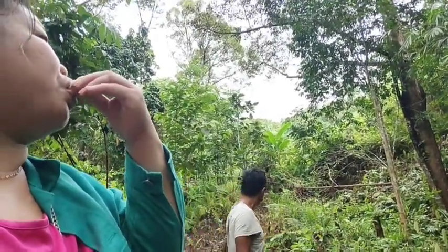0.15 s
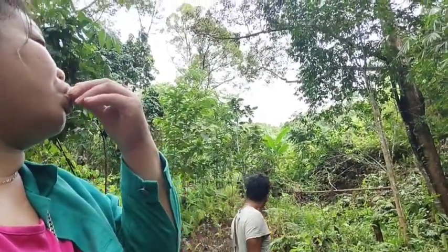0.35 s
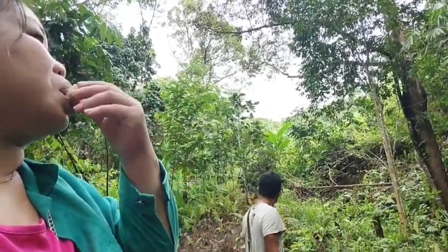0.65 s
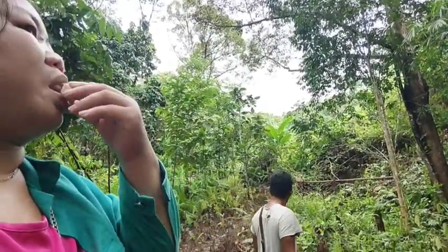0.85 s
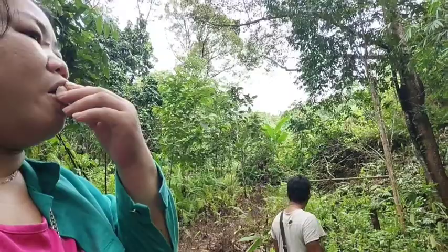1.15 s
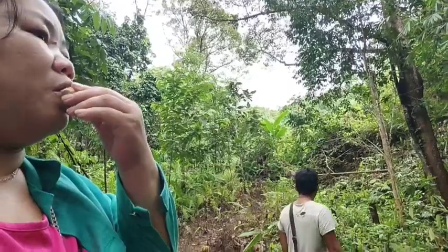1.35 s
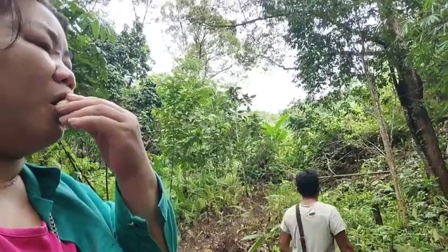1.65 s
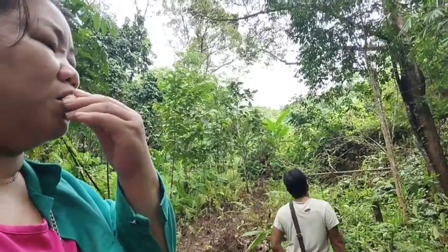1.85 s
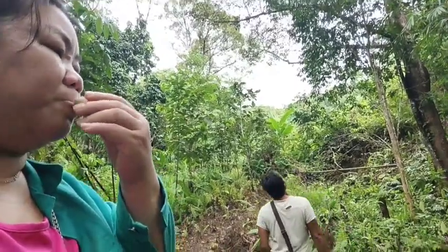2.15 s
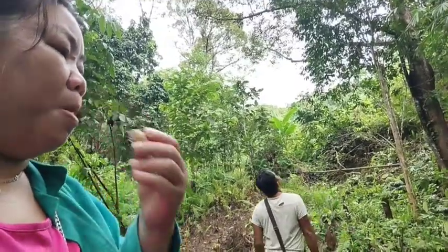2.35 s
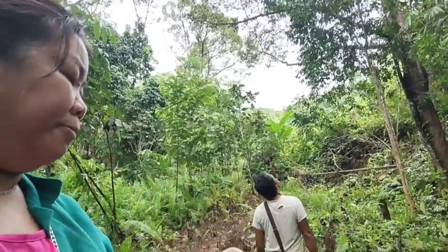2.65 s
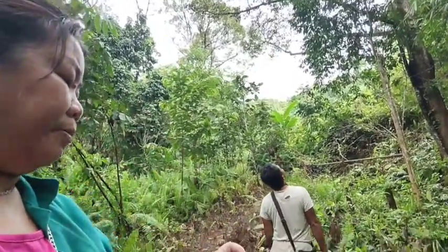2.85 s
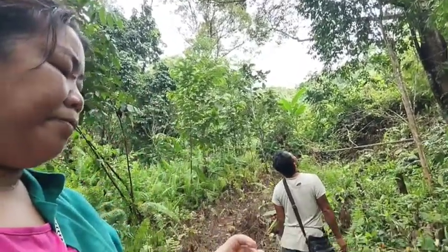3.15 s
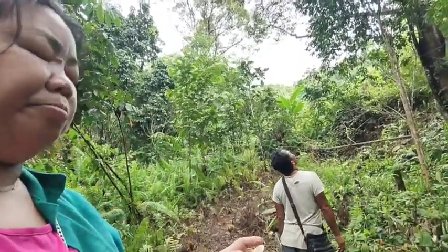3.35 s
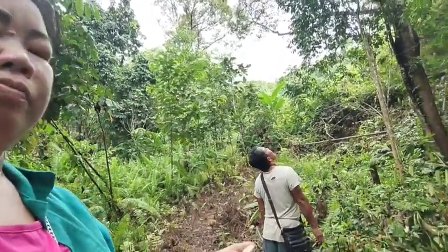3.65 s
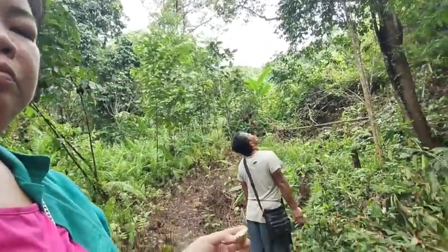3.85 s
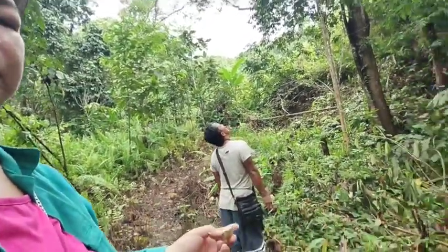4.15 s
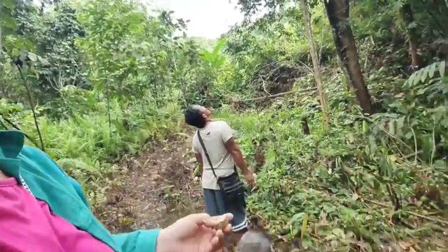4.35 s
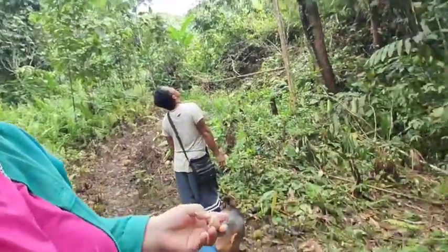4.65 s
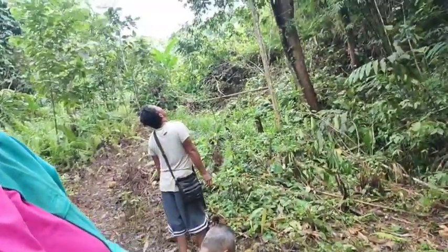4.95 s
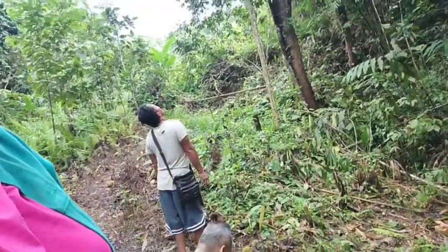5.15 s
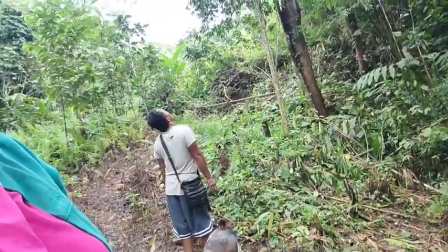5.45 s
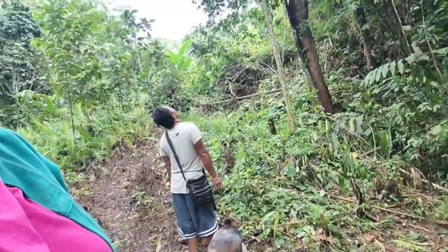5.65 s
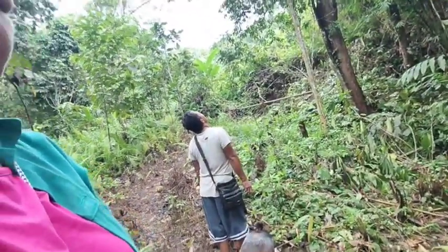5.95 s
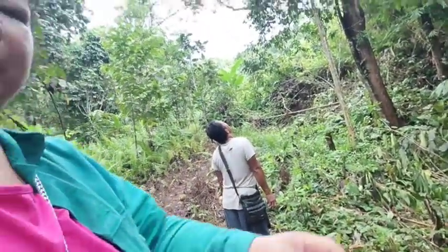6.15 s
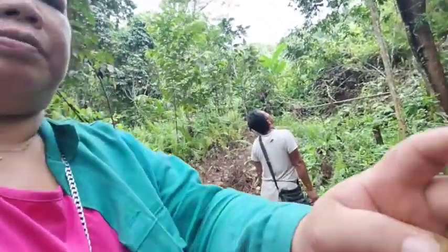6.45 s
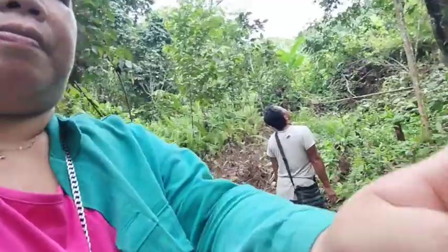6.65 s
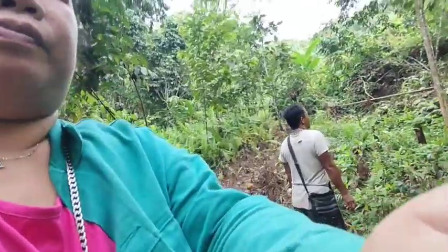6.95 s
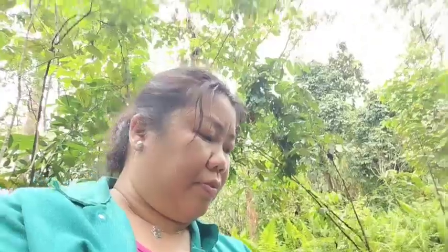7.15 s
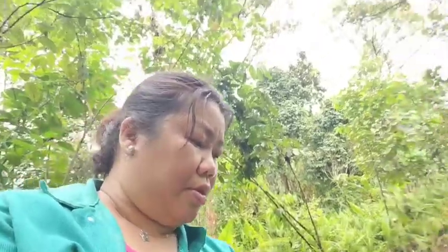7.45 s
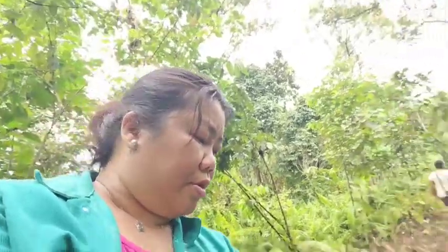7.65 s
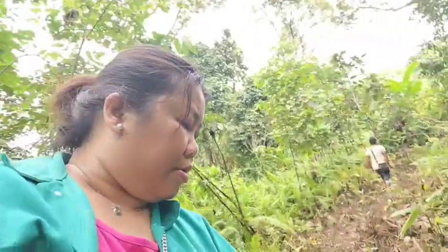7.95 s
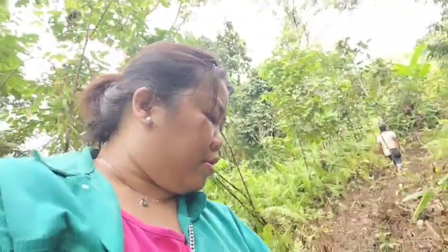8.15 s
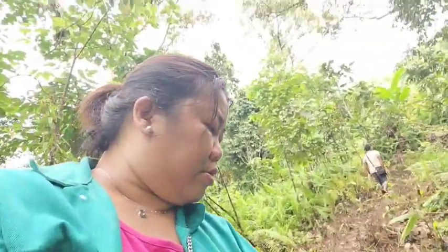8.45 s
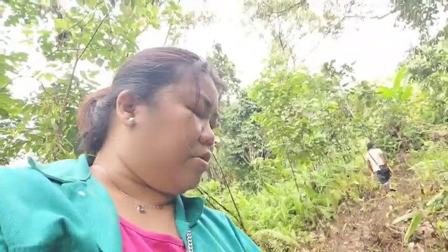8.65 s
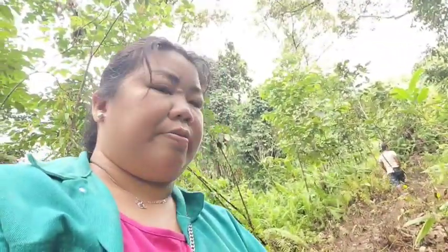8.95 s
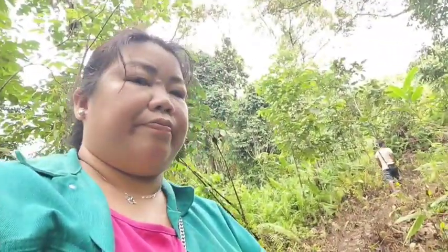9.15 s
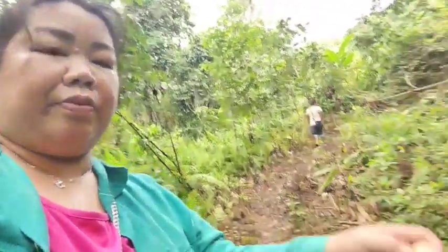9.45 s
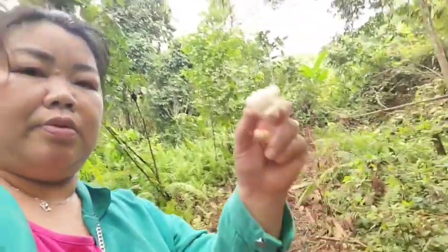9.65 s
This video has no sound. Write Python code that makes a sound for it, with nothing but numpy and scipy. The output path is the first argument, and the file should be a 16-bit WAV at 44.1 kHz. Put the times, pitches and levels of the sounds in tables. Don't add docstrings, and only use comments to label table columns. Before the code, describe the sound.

Handheld stereo microphone among trees: constant high insect whine with fine fast throbbing, faint leaf hiss beneath. Short dry cracks and hollow woody knocks sit close left in the first four seconds, followed by smaller twig snaps ahead and faint drips. A short silent gap comes around seven seconds, then a quick fade-in, a small finger bump at right, and soft leafy rustling.

```python
import sys
import numpy as np
from scipy import signal
from scipy.io import wavfile

SR = 44100
rng = np.random.default_rng(int(sys.argv[2]) if len(sys.argv) > 2 else 0)


def put_to_file(sound):
    columns = np.atleast_2d(sound).T
    safe = np.clip(columns, -1, 1)
    whole_steps = np.round(safe * 32767)
    wavfile.write(sys.argv[1], SR, whole_steps.astype(np.int16))


def voltage_ratio(decibels):
    exponent = np.asarray(decibels, float) / 20
    return 10 ** exponent


N = 432180

# frequency in Hz, density in
# dB per Hz.
AIR = [(18, -65), (30, -21.5), (45, -12), (65, -13), (86, -3), (108, 0.5), (517, -5), (614, -4),
       (1750, -6.5), (3190, -7.5), (5000, -12.5),
       (7000, -8), (10000, -58), (16000, -14)]
# frequency in Hz, left-right likeness from -1 to 1.
AIR_LIKENESS = [(60, .85), (180, .63), (550, .48), (1650, -.05), (4970, .03), (15000, .01)]

# pitch in Hz, width in Hz, left level in dB, right level in dB.
CHIRPER_BODY = [(5936, 130, 1.5, -6.5), (6140, 104, 2, -1.5), (5540, 220, -10.5, -8),
                (12160, 410, -3.5, -0.5), (12330, 170, 4, -3), (10300, 1800, -4, -8.5)]
BUZZER_BODY = [(6983, 590, 4.5, -1), (13550, 3300, 0.5, -8), (15100, 4500, -7, -26.5)]
TRILLER_BODY = [(7664, 170, -1.5, -4.5), (7970, 244, 2, 5), (8110, 130, -15, -4)]
# centre in Hz, width in Hz, share lost from 0 to 1.
SONG_GAPS = [(6600, 150, 0.3), (12735, 1230, 1), (9700, 1460, 1), (9900, 1200, 0.33)]
# level in dB facing the path, level in dB after the turn.
STEADY_LEVELS = [
    (-62, -60.5),
    (-55.5, -55.5),
    (-57, -56.5),
    (-60.5, -61),
]

# start in seconds, peak in dB, ring in Hz.
FAR_DRIPS = [(2.57, -52, 608), (2.90, -48, 434), (2.93, -49, 430), (3.20, -57, 600), (4.269, -51, 2350),
             (5.19, -57, 690), (5.411, -56, 2440), (5.60, -54, 794), (4.18, -53, 304), (8.72, -55, 350),
             (9.145, -50.5, 230), (5.936, -53, 3170), (6.036, -47.5, 193), (8.97, -59.5, 2440),
             (9.005, -52.5, 2320)]
# start in seconds, rms in dB, t60 in seconds, left over right in dB.
RUSTLES = [(.06, -49, 0.53, -1), (.39, -54, .35, 0), (.90, -54, 0.53, 2), (1.26, -54, 0.3, 0),
           (2.088, -54, .3, -11), (3.882, -52, 0.17, -10), (4.32, -48, 0.13, -5), (5.99, -53, 0.2, 0),
           (7.27, -46, .37, 6), (8.2, -50, .4, 3), (9.12, -47, 0.33, 2), (9.6, -56, 0.79, 0)]
# start in seconds, rms in dB, bottom in Hz, top in Hz, t60 in seconds.
SNAPS = [
    (.088, -33, 800, 4140, .09),
    (3.868, -31, 250, 2000, .05),
    (4.26, -47, 1800, 3500, 0.14),
    (4.325, -42.5, 500, 3000, .06),
    (5.18, -41, 400, 1100, .08),
    (5.40, -43.5, 2200, 3600, .12),
    (5.755, -38, 150, 550, 0.075),
    (8.75, -49, 400, 1500, 0.18),
]
# start in seconds, peak in dB, length in ms, side (0 left, 1 right).
FINGER_TAPS = [
    (7.3203, -38, .25, 0),
    (7.3286, -27, .9, 1),
]
# start in seconds, rms in dB, bottom in Hz, top in Hz, t60 in seconds.
SHELL_CRACKS = [
    (.8897, -30, 1500, 19000, 0.064),
    (2.0734, -34, 1100, 19000, .075),
    (3.8748, -29.5, 1000, 9900, 0.025),
]
# start in seconds, peak in dB, ring in Hz, cycles to die by 60 dB.
SHELL_KNOCKS = [(.0893, -26, 1150, 18), (.0930, -32, 1050, 25), (.0900, -35, 1800, 45),
                (.0950, -42, 3800, 80), (.8912, -21, 460, 13), (.8925, -32, 750, 22), (.8934, -27, 480, 9),
                (.8958, -27, 290, 12), (.9030, -40, 105, 10), (2.0746, -27, 800, 24),
                (2.0767, -24, 480, 12), (2.0799, -22, 230, 6), (2.0790, -34, 140, 9),
                (2.0770, -33, 1200, 25), (2.8788, -37, 600, 12), (2.8825, -44, 330, 13),
                (2.8820, -44, 150, 15), (3.8760, -34, 1000, 14), (3.8700, -38, 400, 8),
                (3.8743, -19, 7600, 38), (3.8765, -26, 2700, 20)]

STOP_S, RESUME_S = 6.960, 7.118


def at_hz(points, hz):
    table = np.array(points)
    return np.interp(np.log(hz), np.log(table[:, 0]), table[:, 1])


def rms_one(x):
    return x / np.sqrt(np.mean(x ** 2) + 1e-20)


def drift(rate):
    r = np.exp(-80 * np.pi * rate / SR)
    noise = rng.standard_normal(N // 40 + 4002)
    slow = signal.lfilter([1], [1, -2 * r, r * r], noise)[4000:]
    return np.interp(np.arange(N) / 40, np.arange(len(slow)), rms_one(slow - slow.mean()))


def resonance(x, hz, width_hz):
    r = np.exp(-np.pi * width_hz / SR)
    poles = [1, -2 * r * np.cos(2 * np.pi * hz / SR), r * r]
    return signal.lfilter((1 - r * r) / 2 * np.array([1, 0, -1]), poles, x)


def pan(x, left_db):
    return x * voltage_ratio(np.array([[left_db / 2], [-left_db / 2]]))


def air(level_db, patchy_db):
    out = 0
    together = drift(13.0)
    edges = 30 * 2 ** np.arange(0, 9.6, .5)
    white = rng.standard_normal((2, 2, N))
    for k, (low, high) in enumerate(zip(edges, np.minimum(edges[1:], .45 * SR))):
        band = signal.butter(2, [low, high], "band", fs=SR, output="sos")
        mid, side = signal.sosfilt(band, white[k % 2])
        hz = np.sqrt(low * high)
        alike = at_hz(AIR_LIKENESS, hz)
        gain = voltage_ratio(at_hz(AIR, hz) + patchy_db * (1.2 * together + drift(17.0)))
        out = out + gain * (np.sqrt(1 + alike) * mid + np.sqrt(1 - alike) * side * [[1], [-1]])
    return rms_one(out) * voltage_ratio(level_db + 4.5)


def singers(body, throb_per_s, depths, level_db, flicker_db):
    alike, lag = .2, 18
    turn = 2 * np.pi * np.cumsum(throb_per_s * (1 + 0.0069 * drift(0.29))) / SR
    pulse = 1 + sum(depth * np.cos((k + 1) * turn - 1.4 * k) for k, depth in enumerate(depths))
    out = 0
    for hz, width_hz, left_db, right_db in body:
        left, right = rng.standard_normal((2, N))
        left = np.sqrt(1 - alike ** 2) * left + alike * np.roll(right, lag)
        clicks = np.array([left, right]) * np.clip(pulse, 0, None) * voltage_ratio(flicker_db * drift(13))
        once = resonance(clicks, hz, width_hz * 1.5)
        sharp = resonance(once, hz, width_hz * 1.5)
        out = out + rms_one(sharp) * voltage_ratio(np.array([[left_db], [right_db]]))
    return out * voltage_ratio(level_db + 2.5)


def chorus(chirper_db, buzzer_db, triller_db):
    out = singers(CHIRPER_BODY, 13.1, (.2, .13, .17), chirper_db, flicker_db=.5)
    out = out + singers(BUZZER_BODY, 18.5, (.06, .02, .02), buzzer_db, flicker_db=.45)
    out = out + singers(TRILLER_BODY, 47.85, (.21, .08, .04), triller_db, flicker_db=1.6)
    for hz, width_hz, lost in SONG_GAPS:
        out = out - lost * resonance(out, hz, width_hz)
    return out


def ringing(rows, left_db, lag_ms):
    out = np.zeros((2, N))
    for s, peak_db, hz, t60 in rows:
        at = round(s * SR)
        t = np.arange(round(1.2 * t60 * SR)) / SR - np.array([[0], [lag_ms / 1000]])
        t = np.maximum(t, 0)
        build = 1 - np.exp(-4.0 * hz * t)
        ring = -np.sin(2 * np.pi * hz * t) * build * voltage_ratio(peak_db - 60 * t / t60)
        out[:, at:at + t.shape[1]] += pan(ring, left_db)
    return out


def grainy_bursts(rows):
    out = np.zeros((2, N))
    grains = rng.standard_normal((2, N)) * voltage_ratio(1.5 * drift(200))
    for s, rms_db, low_hz, high_hz, t60, left_db in rows:
        at = round(s * SR)
        t = np.arange(min(round(t60 * SR), N - at)) / SR
        rise = .07 * t60
        swell = np.minimum(t / rise, 1) * voltage_ratio(rms_db - 60 * np.maximum(t - rise, 0) / t60)
        band = signal.butter(2, [low_hz, high_hz], "band", fs=SR, output="sos")
        out[:, at:at + len(t)] += pan(signal.sosfilt(band, grains[:, at:at + len(t)]) * swell, left_db)
    return out


def far_drips():
    return ringing([(s, db, hz, .081) for s, db, hz in FAR_DRIPS], left_db=0, lag_ms=0)


def rustles():
    return grainy_bursts([(s, db, 2000, 12500, t60, left_db) for s, db, t60, left_db in RUSTLES])


def twig_snaps():
    return grainy_bursts([(*row, 0) for row in SNAPS])


def finger_taps():
    out = np.zeros((2, N))
    for s, peak_db, length_ms, side in FINGER_TAPS:
        at = round(s * SR)
        t = np.arange(900) / SR / (length_ms / 2000)
        out[side, at:at + 900] += voltage_ratio(peak_db) * t * np.exp(1 - t) * 1.3
    return signal.sosfilt(signal.butter(2, 90, "high", fs=SR, output="sos"), out + 1e-18)


def shell_cracks():
    return grainy_bursts([(*row, 8) for row in SHELL_CRACKS])


def shell_knocks():
    modes = [(s, db, hz, cycles / hz) for s, db, hz, cycles in SHELL_KNOCKS]
    return ringing(modes, left_db=1.2, lag_ms=.25)


def scene():
    turned = np.arange(N) / SR > STOP_S
    levels = [np.where(turned, after_db, before_db) + .45 * drift(1.7) for before_db, after_db in STEADY_LEVELS]
    chirper_db, buzzer_db, triller_db, air_db = levels
    background = air(air_db, patchy_db=.6) + chorus(chirper_db, buzzer_db, triller_db)
    undergrowth = far_drips() + rustles() + twig_snaps()
    return background + undergrowth + finger_taps() + shell_cracks() + shell_knocks()


def low_pass(x):
    return signal.sosfilt(signal.butter(12, 16640, fs=SR, output="sos"), x)


def record(dry):
    t = np.arange(N) / SR
    tail = np.where(t < STOP_S, 1, voltage_ratio(-16 - 2400 * np.maximum(t - STOP_S, 0)))
    fade = np.clip(.09 + (t - RESUME_S) / .19, 0, 1) * (t >= RESUME_S)
    wet = dry * np.maximum(tail, fade)
    wet[:, round(RESUME_S * SR)] += voltage_ratio(-56)
    wet = signal.sosfilt(signal.butter(2, 65, "high", fs=SR, output="sos"), wet)
    wet = signal.sosfilt(signal.ellip(12, .5, 60, 15490, fs=SR, output="sos"), wet)
    return low_pass(wet)


dry = scene()
out = record(dry)
put_to_file(out)
```